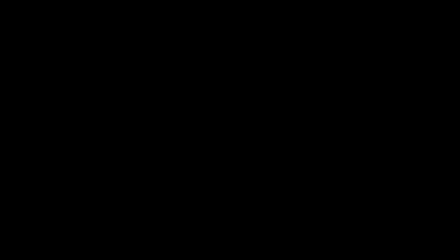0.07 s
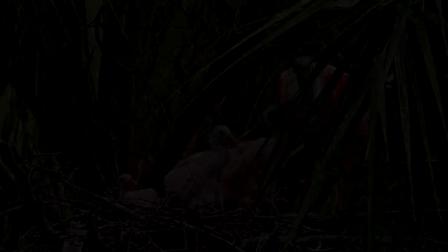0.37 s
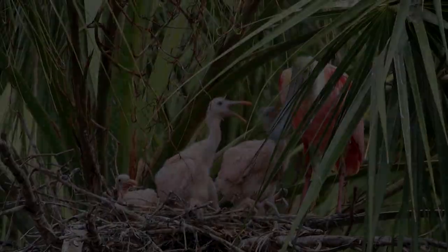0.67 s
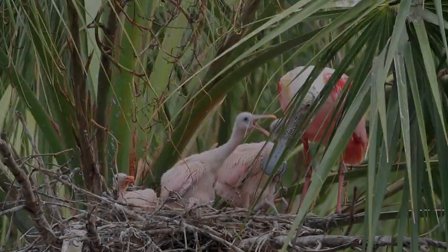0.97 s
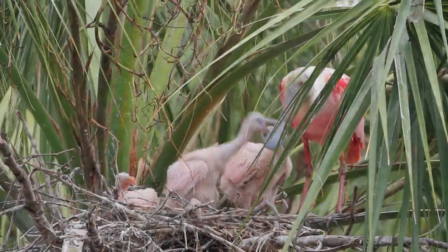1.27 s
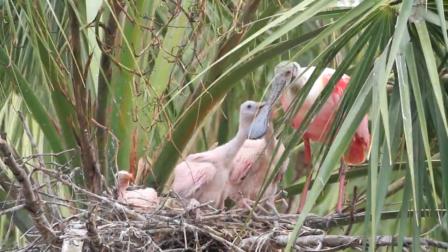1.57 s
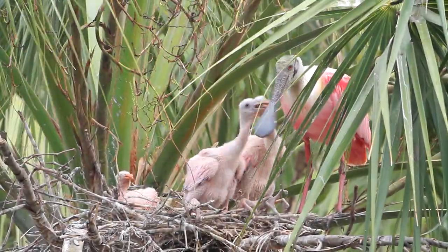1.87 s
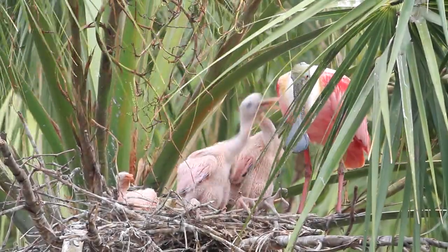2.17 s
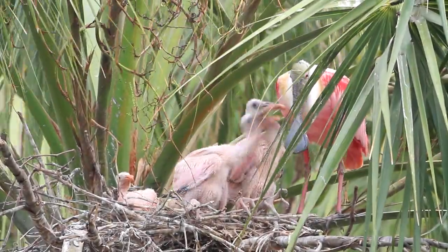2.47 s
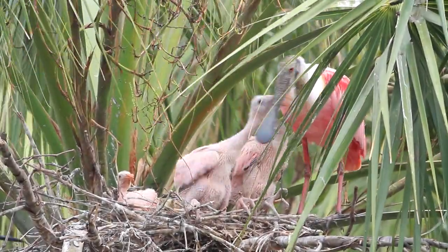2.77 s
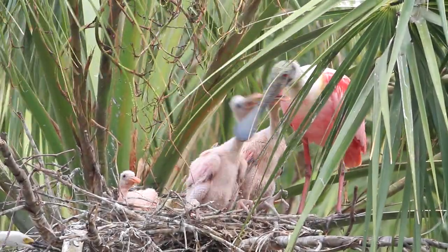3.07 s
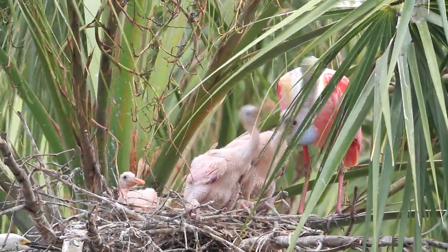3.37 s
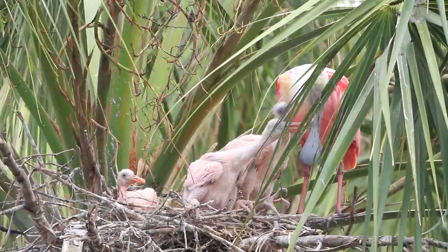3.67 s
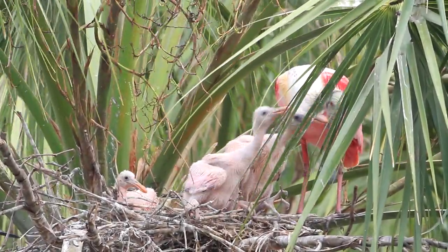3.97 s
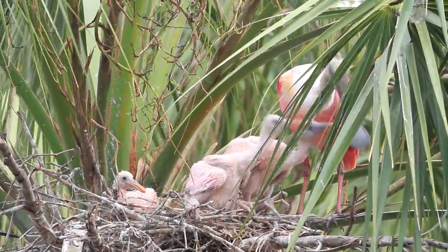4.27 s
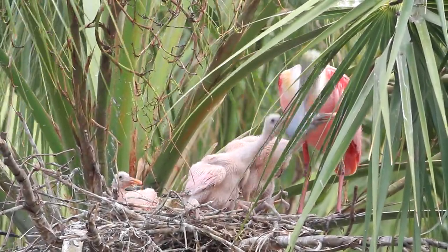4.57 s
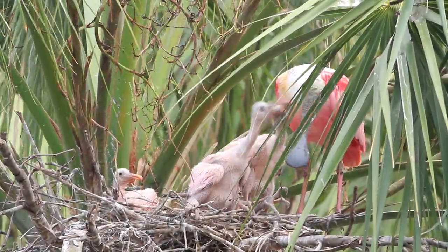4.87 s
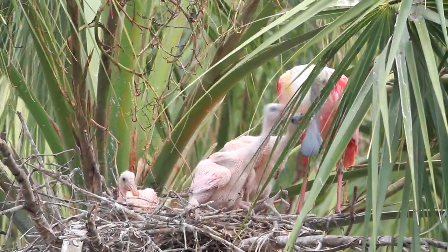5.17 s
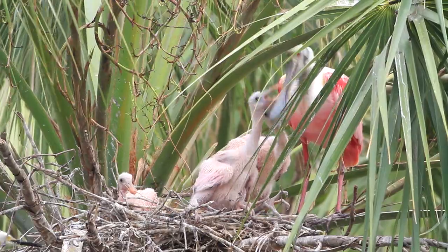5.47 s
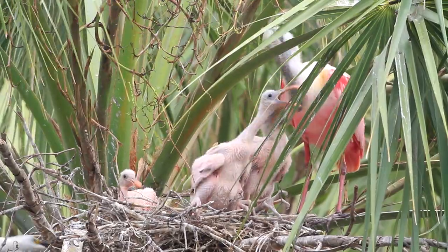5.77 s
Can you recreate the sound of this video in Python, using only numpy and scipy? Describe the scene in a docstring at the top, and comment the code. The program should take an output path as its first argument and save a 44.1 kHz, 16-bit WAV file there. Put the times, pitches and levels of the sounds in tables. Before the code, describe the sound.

Bird chicks beg close by with hoarse peeps, rasps and fast trills over a busy colony, light wind and a faint distant engine.

```python
"""A palm thicket, microphone close to a spoonbill nest. From the start the chicks beg with hoarse arched
peeps, breathy rasps and fast trills from the syrinx; the colony calls behind, a far engine drones and
fronds scatter the calls. A grown bird croaks far off at 0.5 s, and from 1.4 s eddies of wind thump the
microphone. The trills pause after 3.1 s, the engine is loudest near 4.2 s, and a last short trill at 5 s
leads into the harshest rasps and the strongest puff of wind."""
import sys
import numpy as np
from scipy import signal
from scipy.fft import rfft, irfft, next_fast_len
from scipy.io import wavfile

SR = 44100
rng = np.random.default_rng(int(sys.argv[2]) if len(sys.argv) > 2 else 0)


def to_wav(s):
    """Save 16-bit WAV."""
    ch = np.atleast_2d(s).T  # columns
    pcm = np.round(np.clip(ch, -1, 1) * 32767)  # PCM
    wavfile.write(sys.argv[1], SR, pcm.astype(np.int16))


N = 261072
T = np.arange(N) / SR

# Levels are relative within each layer. A call's time and pitch are those at its middle.
# open air all round: (frequency [Hz], level [dB])
AIR_SPECTRUM = [(25, -4), (60, -14), (150, -12.5), (250, 3.5), (380, -3.5), (470, -2.5), (1000, -6),
                (2500, -11), (5000, -4.5), (7000, -18), (10000, -23), (15500, -31)]
# thin hiss of the fronds: (frequency [Hz], level [dB])
FROND_SPECTRUM = [(3000, -27), (6500, 16.5), (8500, 5.5), (10500, 3), (13000, 4.5), (15500, -15)]
# course of that hiss: (time [s], level [dB])
FROND_LEVELS = [(.05, -39.5), (.45, -37.5), (.9, -44.5), (1.5, -34), (1.95, -44), (2.27, -38.5),
                (2.8, -37.5), (3.35, -42), (3.55, -38.5), (3.9, -43.5), (4.85, -41), (5.3, -39),
                (5.55, -48), (5.92, -54)]
# course of the far engine: (time [s], level [dB])
ENGINE_LEVELS = [(.05, -41.5), (.72, -41.5), (1.23, -38.5), (2.1, -37), (2.6, -39.5), (2.8, -33.5),
                 (3.68, -35.5), (4.2, -30.5), (5.05, -38.5), (5.55, -33.5), (5.92, -38)]
# tones of its drone: (frequency [Hz], level [dB])
ENGINE_TONES = [(108, -7), (198, -6), (264, -8.5), (307.5, -4.5), (329, -5), (351, -7), (372, -11.5),
                (416, -12.5)]
# wind on the microphone: (frequency [Hz], level [dB])
WIND_SPECTRUM = [(20, -19), (50, -2), (80, .5), (160, -1.5), (230, -10), (400, -17.5), (1200, -41),
                 (4000, -90)]
# light air between the puffs: (time [s], level [dB])
BREEZE_LEVELS = [(.05, -36), (1.5, -38.5), (2.9, -37.5), (4.1, -34), (4.6, -41.5), (5.2, -32), (5.92, -34)]
# puffs of wind: (time [s], length [s], level [dB])
WIND_PUFFS = [(.48, 0.092, -35), (0.942, .08, -30.5), (1.47, 0.34, -32.5), (2.05, 0.27, -27.5),
              (2.457, .22, -28.5), (2.911, 0.19, -30.5), (3.66, 0.24, -27), (3.96, 0.2, -29),
              (5.061, 0.34, -28.5), (5.531, 0.28, -23)]
# eddies that hit the microphone: (time [s], pitch [Hz], level [dB])
EDDY_THUMPS = [(1.39, 159, -5), (1.469, 118, -15), (2.111, 117, -9), (2.413, 119, -8), (3.606, 151, -16),
               (3.798, 111, -14), (4.111, 100, -16), (5.054, 132.8, -9), (5.07, 189, -11.5),
               (5.146, 105, -9), (5.476, 137, -8.5), (5.538, 180, -14), (5.566, 184, -4.5),
               (5.601, 130, -6.5)]
# grown birds far off: (time [s], length [s], pulse rate [Hz], resonance [Hz], level [dB])
ADULT_CROAKS = [(0.54, 0.085, 157.2, 975, -29.5), (1.767, 0.095, 171.2, 1390, -32),
                (3.918, 0.11, 140.3, 810, -37.5), (4.641, 0.077, 188, 1400, -41)]
# the colony behind the nest: (time [s], chorus level [dB], chatter level [dB])
COLONY_LEVELS = [(0.06, -25.5, -42), (0.12, -24, -40), (0.24, -21.5, -41), (0.37, -24, -35),
                 (0.76, -28, -32), (1.44, -24, -35), (1.8, -28.5, -34.5), (2.3, -25, -35),
                 (2.76, -22.5, -35), (3.02, -23, -33.5), (3.51, -24, -36.5), (3.91, -28.5, -33),
                 (4.92, -27.5, -34.5), (5.17, -27, -38), (5.54, -28, -33), (5.9, -25, -37)]
# blur of the furthest chicks: (frequency [Hz], level [dB])
CHORUS_SPECTRUM = [(1500, -18), (2200, -18), (2600, -9), (3100, -8.5), (3700, -7.5), (4300, -7.5),
                   (5100, -11.5), (5900, -24.5), (8000, -29), (14000, -73)]
# low chatter of the colony: (frequency [Hz], level [dB])
CHATTER_SPECTRUM = [(350, -21), (600, -5), (1000, -3.5), (1600, 3), (2200, 3.5), (3200, 2), (6000, -64)]
# chicks in the next nest: (time [s], length [s], pitch [Hz], rise [octaves], level [dB])
NEIGHBOUR_WHISTLES = [(.725, .05, 2500, -.4, -32), (.79, .03, 3370, -0.024, -30),
                      (.938, .03, 3990, 0.032, -29), (1.175, .06, 2850, -.09, -29.5),
                      (1.302, .035, 3830, -.24, -27.5), (1.522, .045, 2420, -.5, -32),
                      (2.948, .035, 3390, 0, -25), (3.32, .06, 3900, 0.083, -27.5),
                      (3.48, .05, 3640, 0.08, -33), (3.552, .03, 3140, -.06, -27.5),
                      (3.618, .035, 3900, -0.07, -30), (3.763, .04, 3800, 0.24, -26.5),
                      (3.868, .03, 4000, .13, -32), (4.365, .03, 3420, -.35, -29),
                      (4.73, .03, 3310, 0, -28.5), (5.175, .07, 3380, -.21, -28),
                      (5.21, 0.06, 2310, -0.5, -33.5), (5.37, .08, 3600, -.05, -33),
                      (5.69, .06, 3750, 0.074, -28.5)]
# toneless rasps at the near nest: (time [s], length [s], level [dB])
DRY_RASPS = [(.13, 0.099, -33.5), (0.27, 0.081, -29.5), (0.403, .067, -29.5), (0.455, .05, -30.5),
             (0.874, 0.042, -30.5), (1.737, 0.045, -28.5), (2.01, 0.091, -31.5), (2.15, 0.075, -31.5),
             (2.32, 0.15, -33.5), (2.69, .066, -29.5), (3.304, .093, -32), (3.493, .1, -33),
             (3.73, .06, -36), (4.248, 0.18, -33.5), (4.51, .11, -34.5), (4.765, 0.079, -34),
             (5.174, 0.073, -28), (5.228, 0.036, -31), (5.296, .12, -24.5), (5.42, 0.091, -26.5),
             (5.569, 0.087, -29.5), (5.71, 0.087, -30), (5.857, 0.14, -31.5)]
# breath in those rasps: (frequency [Hz], level [dB])
DRY_RASP_SPECTRUM = [(800, -3), (2000, -24), (2700, 3), (3700, 11.5), (5000, 4.5), (5900, 2.5),
                     (7300, -1.5), (8800, -6.5), (10500, -12), (13000, -11.5), (15500, -23)]
# course of the trills, one list a bout: (time [s], syllable rate [1/s], pitch [Hz], level [dB])
TRILL_BOUTS = [
    [(.085, 29, 3840, -31), (.148, 34, 3800, -30), (.218, 19, 4660, -39), (.345, 26, 4900, -31),
     (.39, 41, 5150, -34), (.475, 40, 5260, -25.5), (.53, 36, 5180, -28), (.635, 33, 5000, -31),
     (.703, 32, 4220, -31)],
    [(1.168, 24.5, 4050, -29), (1.205, 26.1, 4340, -35), (1.29, 27.5, 5240, -30), (1.42, 25, 5000, -29.5),
     (1.65, 27, 5040, -30), (1.705, 26.1, 4600, -38)],
    [(2.511, 28.4, 4720, -31.5), (2.585, 27.6, 5060, -27), (2.67, 26.4, 4950, -37),
     (2.735, 25, 4730, -29.5), (2.81, 19, 4850, -38), (2.865, 31, 4860, -26), (2.945, 35, 4813, -28),
     (3.003, 27, 4500, -35), (3.07, 29, 4970, -28)],
    [(4.88, 31, 5000, -35.5), (5.01, 35, 5010, -30.5), (5.085, 37, 4840, -31.5)],
]
# the trilling voice in each bout: (pitch jitter [share], arch [octaves], second harmonic [dB])
BOUT_VOICES = [(0.0376, 0.323, -23), (0.025, 0.268, -15), (0.027, 0.183, -23), (0.039, .17, -27)]
# peeps at the near nest: (time [s], length [s], pitch [Hz], rise [octaves], tone level [dB],
# fundamental gain [dB], half-harmonic gain [dB], breath level [dB])
BEGGING_PEEPS = [(0.167, 0.06, 2770, 0, -30, 3, 5, -22.5), (0.648, 0.073, 2664, .06, -30, -1, 0, -29),
                 (0.926, 0.068, 2540, .13, -31, -2, -5, -28), (1.038, 0.068, 2476, 0, -32, -12, -12, -25.5),
                 (1.128, 0.089, 2640, .05, -32, 1, -4, -24.5), (1.425, 0.054, 2800, .21, -31, -3, -12, -29),
                 (1.593, 0.067, 2655, .04, -27, 1, 0, -24.5), (1.886, 0.067, 2586, 0, -32, -5, 0, -24.5),
                 (2.091, 0.057, 2655, .02, -27.5, -1, 3, -28), (2.412, 0.059, 2570, .1, -38, 3, -6, -23),
                 (2.604, .059, 2677, 0, -28, 4, 5, -25), (2.829, 0.063, 2630, -.16, -26.5, 2.5, -13, -26),
                 (2.912, 0.095, 2490, 0, -33.5, 0, 4, -22.5), (2.991, 0.057, 2560, .03, -30.5, 7, -17, -27),
                 (3.104, 0.066, 2640, .06, -26, -2, -3, -27),
                 (3.402, 0.056, 2610, .11, -29.5, -1, 1, -27.5),
                 (3.589, .086, 2765, -.06, -27, 3, 1, -24.5), (3.899, .055, 2570, .1, -29.5, -6, 2, -24.5),
                 (4.092, .065, 2777, -.17, -27, -8, -3, -32), (4.399, 0.054, 2575, .04, -28, -5, -5, -25),
                 (4.611, 0.08, 2730, .03, -29, 0, 2, -27), (4.927, 0.066, 2516, .08, -29.5, -6, -1, -26),
                 (5.139, 0.059, 2640, -.05, -26.5, 2, 4, -23.5), (5.466, 0.042, 2554, .06, -29, 0, 4, -23),
                 (5.662, 0.047, 2654, .05, -27, 2, 2, -25.5)]
# breath in each peep: (frequency [Hz], level [dB])
PEEP_BREATH_SPECTRUM = [(800, -8.5), (2000, -11), (2700, 3), (3800, 6), (5100, 5), (6000, -1.5),
                        (8000, -10.5), (10500, -16.5), (13000, -12), (15500, -27)]
# resonances of a chick's throat and open bill: (frequency [Hz], gain [dB])
THROAT_RESPONSE = [(1300, -13.5), (2000, 14), (2650, 2.5), (3900, -1), (5000, 2.5), (5600, 1.5),
                   (6500, -31), (7900, -5.5), (10300, -15), (13000, -23), (16000, -28)]


def undb(db):
    """Decibels to gain."""
    return 10 ** (np.asarray(db) / 20)


def unit(x):
    """Scale to rms 1."""
    return x / np.sqrt(np.mean(x ** 2) + 1e-18)


def curves(table):
    """Each column after the time as a control over the whole scene."""
    times, *columns = np.transpose(table)
    return [np.interp(T, times, column) for column in columns]


def response(spectrum, hz):
    """Gain of a spectrum at the given frequencies."""
    knots_hz, db = np.transpose(spectrum)
    return undb(np.interp(np.log(hz + 1e-9), np.log(knots_hz), db))


def noise(spectrum):
    """Noise of the given spectrum, rms 1."""
    size = next_fast_len(N, True)
    gain = response(spectrum, np.fft.rfftfreq(size, 1 / SR))
    return unit(irfft(rfft(rng.standard_normal(size)) * gain, size)[:N])


def wander(rate, size=N):
    """Random values, a new one every 1 / rate s, joined by lines; spread near 1."""
    knots = np.random.default_rng(rng.integers(2 ** 31)).standard_normal(int(size * rate / SR) + 2)
    return 1.143 * np.interp(np.arange(size) * rate / SR, np.arange(len(knots)), knots)


def span(middle, length):
    """Sample indices of an event, its own time u from -1 to 1, and its rounded swell."""
    index = np.arange(max(0, int((middle - length / 2) * SR)), min(N, int((middle + length / 2) * SR)))
    u = np.clip((index / SR - middle) * 2 / length, -1, 1)
    return index, u, np.cos(np.pi * u / 2)


def thicket():
    """The bed of the place: open air and a thin hiss from the fronds."""
    hiss_db, = curves(FROND_LEVELS)
    hiss = noise(FROND_SPECTRUM)
    air = undb(-33.5 + .29 * wander(5.22)) * noise(AIR_SPECTRUM)
    return air + undb(hiss_db - 1.5 + 3.2 * wander(26.93)) * hiss


def foliage(x, t60):
    """Dense scatter off trunks and fronds, reaching the microphone 4 ms after the direct sound."""
    t = T[:SR // 2]
    tail = rng.standard_normal(len(t)) * undb(-60 * t / t60) * (t > .004)
    return signal.fftconvolve(x, tail / np.linalg.norm(tail))[:N]


def engine(waver_hz=3.45, fade_db=3.9):
    """A far engine: a few low tones that waver and fade on their way."""
    level_db, = curves(ENGINE_LEVELS)
    drone = np.zeros(N)
    for hz, db in ENGINE_TONES:
        gain = undb(db + fade_db * wander(9))
        drone += gain * np.sin(2 * np.pi * np.cumsum(hz + waver_hz * wander(18)) / SR)
    return undb(level_db - .5) * drone


def wind(swing_db=2.5, thump_cycles=2.8):
    """Air on the microphone: a low flutter that swells with each puff, and single eddies that thump."""
    breeze_db, = curves(BREEZE_LEVELS)
    flow = undb(breeze_db + swing_db * wander(20))
    for time, length, db in WIND_PUFFS:
        index, _, swell = span(time, length)
        flow[index] = np.hypot(flow[index], undb(db) * swell)
    out = flow * noise(WIND_SPECTRUM)
    for time, hz, db in EDDY_THUMPS:
        index, _, swell = span(time, thump_cycles / hz)
        phase = 2 * np.pi * hz * (T[index] - time) + rng.uniform(0, 2 * np.pi)
        out[index] += undb(db - 5) * swell ** 3 * np.sin(phase)
    return out


def syrinx(u, middle_hz, rise, arch, jitter):
    """Phase of a membrane whose pitch arches with air pressure and shakes; rise and arch in octaves."""
    hz = middle_hz * 2 ** (rise * u / 2 - arch * u ** 2) * (1 + jitter * wander(1445, len(u)))
    return 2 * np.pi * np.cumsum(hz) / SR


def croaks(bandwidth_hz=160):
    """Grown birds far off: slow uneven pulses ring a long throat, and the fronds scatter the sound."""
    out, t = np.zeros(N), T[:SR // 50]
    for time, length, rate_hz, hz, db in ADULT_CROAKS:
        index, u, swell = span(time, length)
        phase = syrinx(u, rate_hz, rise=0, arch=.08, jitter=.127)
        pulses = np.diff(phase // (2 * np.pi), prepend=0)  # one a cycle
        modes = np.sin(2 * np.pi * hz * t) + 1.15 * np.sin(2 * np.pi * 2.06 * hz * t)
        throat = np.exp(-np.pi * bandwidth_hz * t) * modes
        out[index] += undb(db) * swell * unit(np.convolve(pulses, throat)[:len(u)])
    return .91 * (out + foliage(out, t60=.29))


def whistles(calls, octave_db=-23):
    """Thin arches from chicks beyond the near nest; pure when high, hoarse when the voice is low."""
    out = np.zeros(N)
    for time, length, hz, rise, db in calls:
        index, u, swell = span(time, length)
        jitter = np.interp(hz, [2500, 3300], [.075, .012])
        phase = syrinx(u, hz, rise, arch=.1964, jitter=jitter)
        out[index] += undb(db + 5) * swell * (np.sin(phase) + undb(octave_db) * np.sin(2 * phase))
    return out


def colony(count=320, spread_db=5):
    """Many distant chicks whistle at random; the furthest blur into a hiss above a low chatter."""
    chorus_db, chatter_db = curves(COLONY_LEVELS)
    times = np.linspace(.05, T[-1] - .05, count)
    draws = rng.uniform(-1, 1, (count, 5))
    calls = whistles([
        (time + .03 * late, .04 * np.exp(.43 * long), 3650 * np.exp(.13 * high), .213 * rise,
         spread_db * loud)
        for time, (long, high, rise, loud, late) in zip(times, draws)])
    voices = unit(calls + undb(2) * foliage(calls, t60=.2))
    hiss = unit(noise(CHORUS_SPECTRUM) * undb(2.6 * wander(120)))
    chatter = unit(noise(CHATTER_SPECTRUM) * undb(2.4 * wander(60)))
    chorus = undb(-6.5) * voices + undb(-4.5) * hiss
    return undb(chorus_db) * chorus + undb(chatter_db) * chatter


def rasps(calls, spectrum, rattle_db, attack):
    """Close by, air rattles through a throat in spurts; the pressure builds fast and ebbs more slowly."""
    pressure = np.zeros(N)
    crest = 2 * attack - 1  # attack is a share of the spurt
    for time, length, db in calls:
        index, u, _ = span(time + length * .1, length * 1.215)
        pressure[index] += undb(db) * np.interp(u, [-1, crest, 0, .45, 1], [.00078, .7, .6, .49, 0])
    return pressure * unit(noise(spectrum) * undb(rattle_db * wander(900)))


def syllables(bout, pitch_spread=.0115, spread_db=1.2):
    """Time, pitch and level of each syllable of a trill; they follow at the bout's rate, no two alike."""
    times, *course = np.transpose(bout)
    time = times[0]
    while True:
        rate, hz, db = (np.interp(time, times, column) for column in course)
        if time > times[-1] + .5 / rate:
            return
        sharp, loud = rng.standard_normal(2)
        yield time, hz * (1 + pitch_spread * sharp), db + spread_db * loud
        time += 1 / rate


def trills(syllable_s=.034, lower_ratio=.8, lower_db=-8, rattle_db=3.5):
    """Rapid arched syllables close by; both sides of the syrinx sound, one lower, and beat roughly."""
    out = np.zeros(N)
    for bout, (jitter, arch, octave_db) in zip(TRILL_BOUTS, BOUT_VOICES):
        for time, hz, db in syllables(bout):
            index, u, swell = span(time, syllable_s)
            upper = syrinx(u, hz, rise=-.076, arch=arch, jitter=jitter)
            lower = syrinx(u, hz * lower_ratio, rise=-.12, arch=arch, jitter=2 * jitter)
            tone = np.sin(upper) + undb(octave_db) * np.sin(2 * upper) + undb(lower_db) * np.sin(lower)
            rattle = undb(rattle_db * wander(800, len(u)))
            out[index] += undb(db + 3.3) * swell ** .5 * unit(tone * rattle)
    return out


def peeps(flutter_db=3):
    """Begging peeps close by; the membrane beats strong-weak, adding lines between the harmonics."""
    out = np.zeros(N)
    k = np.arange(1, 12)[:, None]  # multiples of half the pitch: 2 is the fundamental
    for time, length, hz, rise, tone_db, fundamental_db, half_db, _ in BEGGING_PEEPS:
        index, u, swell = span(time, length)
        phase = syrinx(u, hz, rise, arch=.2, jitter=.012)
        pitch_hz = np.diff(phase, prepend=0) * SR / (2 * np.pi)
        throat = response(THROAT_RESPONSE, k * pitch_hz / 2)
        membrane = undb(half_db * (k % 2) + fundamental_db * (k == 2))
        # the beat is never quite even, so each line flutters on its own
        flutter = undb(flutter_db * np.array([wander(497, len(u)) for _ in k]))
        lines = throat * membrane * flutter * np.sin(k * phase / 2 + rng.uniform(0, 2 * np.pi, k.shape))
        out[index] += undb(tone_db + 3.3) * swell * unit(lines.sum(0))
    return out


def scene():
    """One microphone near the nest, with the colony, thicket and engine beyond and wind across it."""
    breaths = [(time, length, breath_db) for time, length, *_, breath_db in BEGGING_PEEPS]
    begging = peeps() + undb(1.5) * rasps(breaths, PEEP_BREATH_SPECTRUM, rattle_db=1.5, attack=.22)
    rasping = undb(5.5) * rasps(DRY_RASPS, DRY_RASP_SPECTRUM, rattle_db=2.5, attack=.23)
    chicks = begging + rasping + trills() + whistles(NEIGHBOUR_WHISTLES)
    foreground = undb(.8) * chicks + undb(-7.5) * foliage(chicks, t60=.15)
    return (foreground + colony() + croaks() + thicket() + engine() + wind())[None]


def record(dry):
    """The recorder opens after a moment of silence and cuts the top treble."""
    start_s, cutoff_hz = .046, 15150
    lowpass = signal.ellip(10, .2, 80, cutoff_hz, fs=SR, output="sos")
    return signal.sosfilt(lowpass, dry * (T >= start_s))


dry = scene()
out = record(dry)
to_wav(out)
```